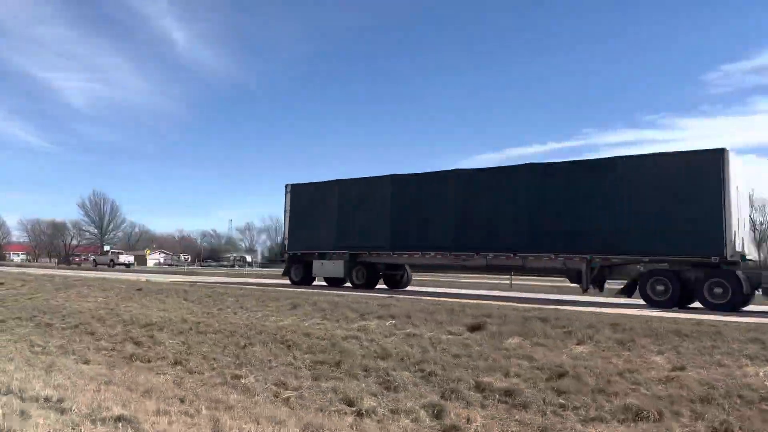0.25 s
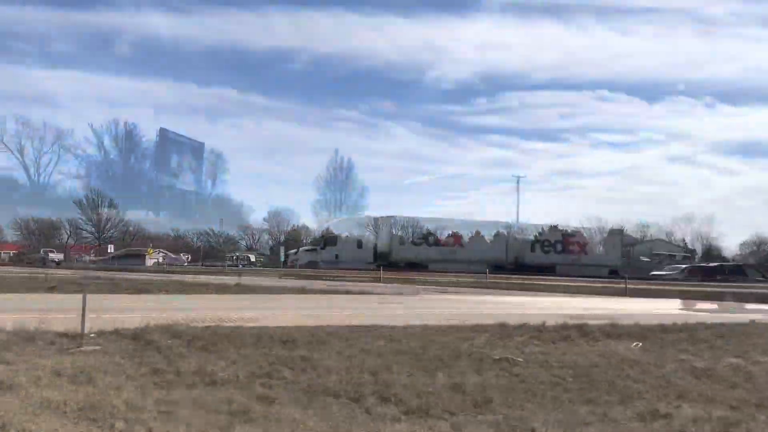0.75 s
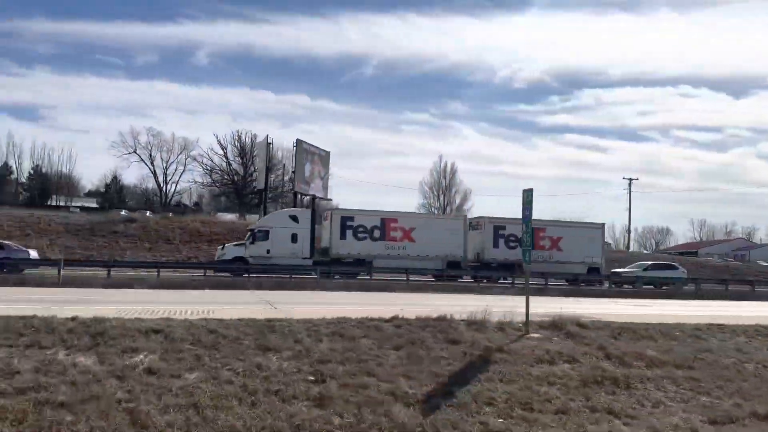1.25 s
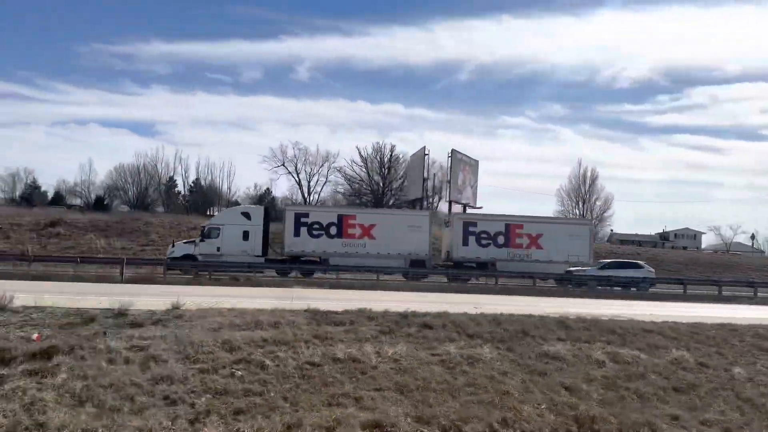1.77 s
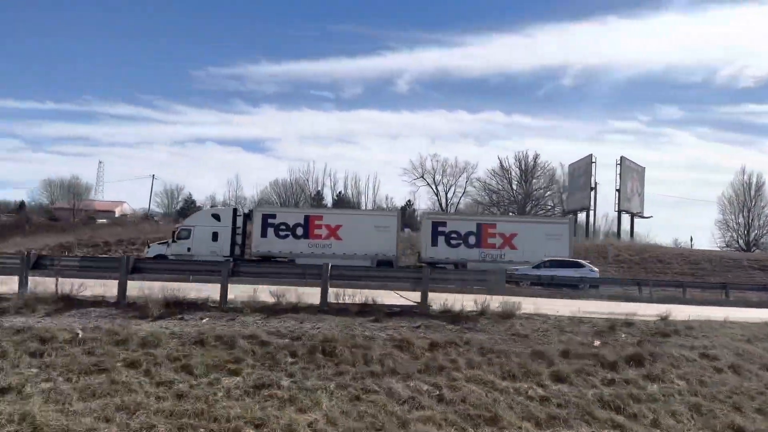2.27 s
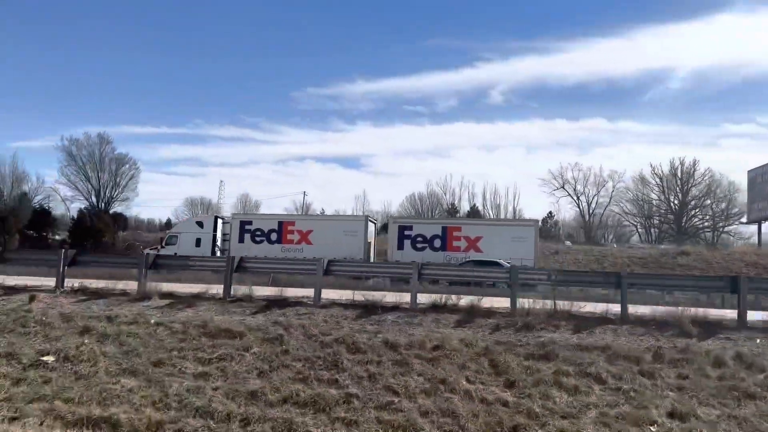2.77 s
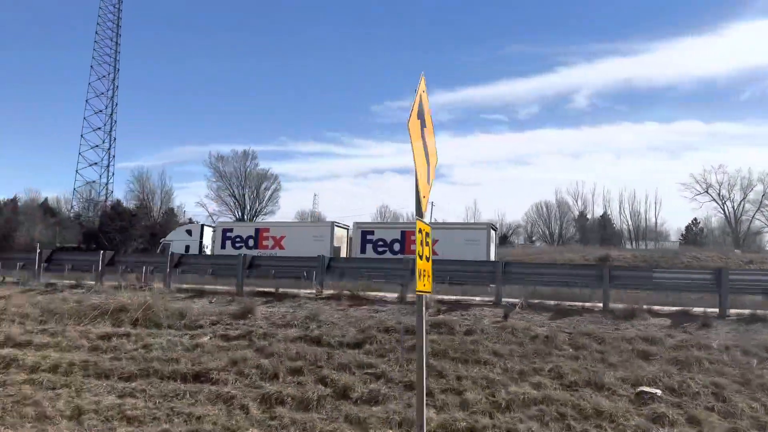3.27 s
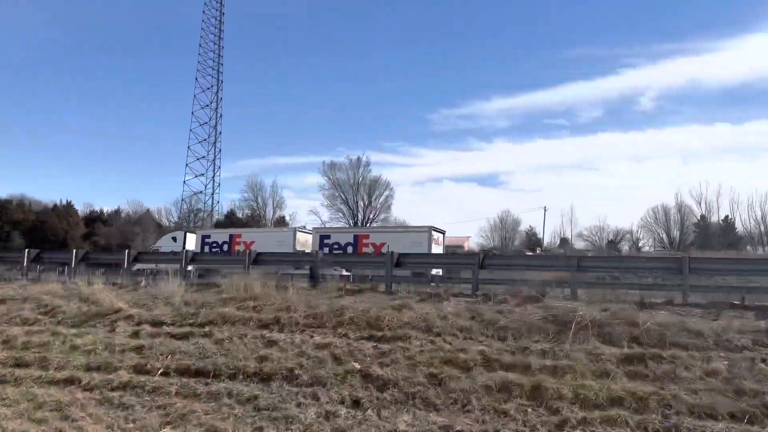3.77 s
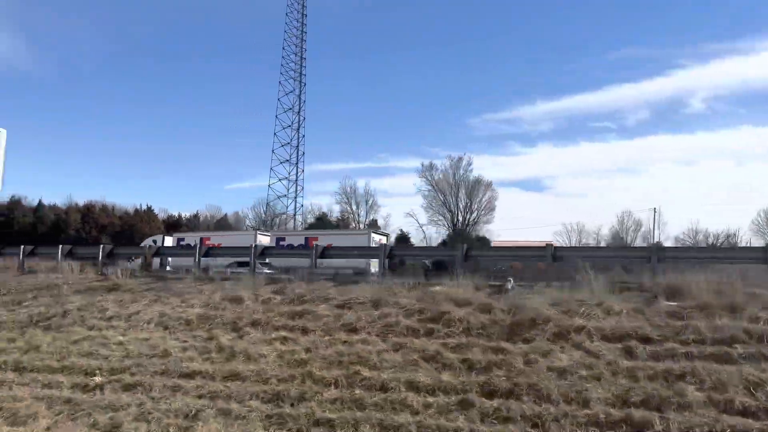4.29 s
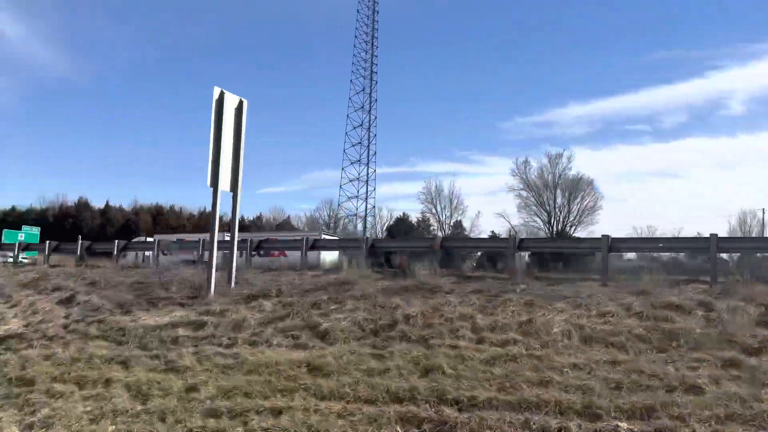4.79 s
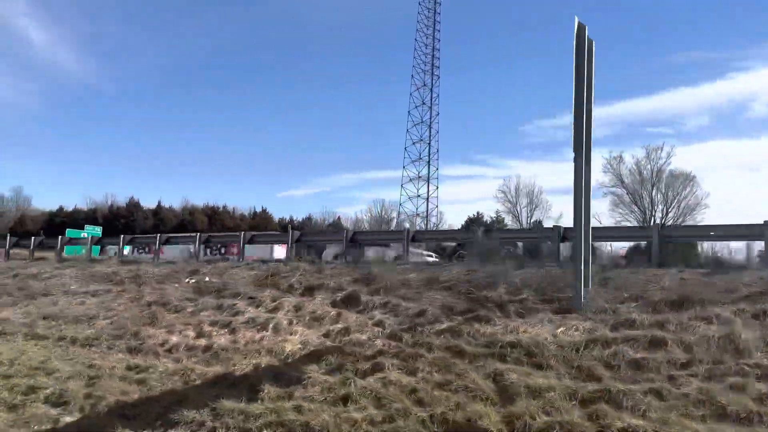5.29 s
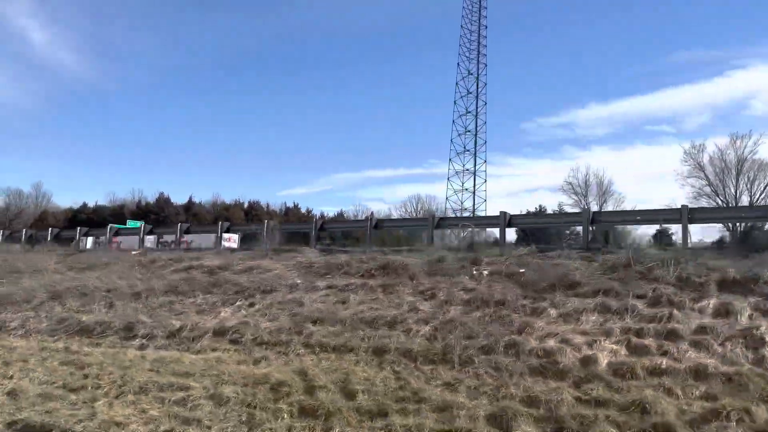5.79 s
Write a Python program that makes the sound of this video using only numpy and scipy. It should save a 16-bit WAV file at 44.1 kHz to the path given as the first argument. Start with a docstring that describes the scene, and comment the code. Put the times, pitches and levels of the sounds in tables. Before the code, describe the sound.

Close truck pass, tyre hiss and falling whistle cut off quickly, followed by thumping, rasping wind gusts and road roar beside a moving car's window.

```python
"""First a truck goes by close to a car's open side window: hissing tyres, a drone and a falling whistle.
Beyond it the highway roars on; at the window, air buffets the two ports of a hand-held phone,
rasping in short gusts and later spitting in the right port. All of it is coloured noise and fuzzy tones:
the truck follows its distance and Doppler shift, the wind follows drifting eddies and timed bursts."""
import sys
import numpy as np
from scipy import signal
from scipy.fft import rfft, irfft
from scipy.io import wavfile
from scipy.ndimage import uniform_filter1d, map_coordinates

SR = 44100
rng = np.random.default_rng(int(sys.argv[2]) if len(sys.argv) > 2 else 0)


def to_wav(s):
    """Save 16-bit WAV."""
    ch = np.atleast_2d(s).T  # columns
    pcm = np.round(np.clip(ch, -1, 1) * 32767)  # PCM
    wavfile.write(sys.argv[1], SR, pcm.astype(np.int16))


N = 266364
T = np.arange(N) / SR
HZ = np.fft.rfftfreq(N, 1 / SR)


def gain_of(db):
    """Decibels to amplitude."""
    return 10 ** (np.asarray(db) / 20)


def evened(x):
    """Scales to rms 1."""
    return x / np.sqrt(np.mean(x ** 2) + 1e-20)


def read(points):
    """A table over frequency, joined on a log axis."""
    hz, value = np.transpose(points)
    return np.interp(np.log(HZ + 1), np.log(hz), value)


def curves(rows):
    """Each column of a table over time, at every sample."""
    s, *columns = np.transpose(rows)
    return [np.interp(T, s, column) for column in columns]


def rise(start_s, full_s):
    """Goes from 0 to 1 between two times and holds."""
    return np.clip((T - start_s) / max(full_s - start_s, 1e-3), 0, 1)


def pan(balance_db):
    """Left and right gains of constant power; a positive balance leans left."""
    pair = gain_of(np.array([[.5], [-.5]]) * balance_db)
    return pair / np.sqrt(np.mean(pair ** 2, axis=0))


# How alike the two microphone ports hear a noise.
# Each row: frequency in Hz, likeness from 0 to 1, lead of the left port in radians.
PORT_LIKENESS = [(60, 0.55, 0), (282, 0.29, 1), (472, 0.75, -2.5), (569, 0.75, -3), (702, 0.98, -2.5),
                 (888, 0.5, -2.5), (1130, 0.17, -1.1), (1940, 0.45, -0.96), (2420, 0.16, -2.5),
                 (2530, 0, -3), (3350, 0.62, -4.5), (4430, 0.5, -6), (6400, 0.26, 1)]


def noise(colour, fall_db=15):
    """Noise of rms 1 as the two ports hear it; above its last point it falls by fall_db an octave."""
    left, other = rfft(rng.standard_normal((2, N)))
    hz, same, lead = np.transpose(PORT_LIKENESS)
    same = np.clip(read(np.c_[hz, same]), 0, 1)
    lead = read(np.c_[hz, lead])
    right = same * np.exp(-1j * lead) * left + np.sqrt(1 - same ** 2) * other
    colour_db = read(colour) - fall_db * np.log2(np.maximum(HZ / colour[-1][0], 1))
    return evened(irfft(np.array([left, right]) * gain_of(colour_db), N))


def wander(low_hz, high_hz):
    """A random drift of rms 1 between two rates."""
    band = 1 / np.sqrt((1 + (HZ / high_hz) ** 6) * (1 + (low_hz / (HZ + 1e-3)) ** 4))
    return evened(irfft(rfft(rng.standard_normal(N)) * band, N))


def flutter(drift, depth_db):
    """Turbulence comes in clumps: a gain of rms 1 that follows a drift in decibels."""
    return evened(gain_of(depth_db * np.minimum(drift, 2)))


def mottled(sound, patchy_db, size=5):
    """Moving air and shifting reflections brighten patches about 80 ms long and size bins of 43 Hz wide."""
    spectra = signal.stft(sound, nperseg=1024, noverlap=768)[2]
    patches = rng.standard_normal(spectra.shape[1:])
    patches = uniform_filter1d(patches, size=size, axis=0)
    patches = evened(uniform_filter1d(patches, size=14, axis=1))
    patchy = signal.istft(spectra * gain_of(patchy_db * patches), nperseg=1024, noverlap=768)[1]
    return evened(patchy[:, :N])


def fuzzy_tone(hz, width_hz):
    """A narrow band of noise around a steady or gliding pitch, drawn separately for each port."""
    turn = 2 * np.pi * np.cumsum(hz * np.ones(N)) / SR
    return np.array([wander(0.73, width_hz) * np.cos(turn) + wander(0.83, width_hz) * np.sin(turn)
                     for port in range(2)])


def add(mix, sound, s, length, level, steepness=2, tail_steepness=1.25):
    """Adds a burst centred on s, length wide at half height; steepness squares its front, the tail differs."""
    span = slice(max(round((s - 2 * length) * SR), 0), round((s + 3 * length) * SR))
    power = np.where(T[span] < s, steepness, tail_steepness)
    bell = 2 ** -abs(2 * (T[span] - s) / length) ** power
    mix[:, span] += level * evened(sound[:, span] * bell) * np.sqrt(np.mean(bell ** 2))


# Road noise of the car and of farther traffic.
# Each row: time in seconds, roar in dB before the roar offset, hiss in dB.
ROAD_LEVELS = [(0, -37, -38.5), (.6, -51, -35.5), (.9, -31.5, -43.5), (1.9, -49, -45.5), (2.5, -40.5, -49),
               (3.1, -38, -49), (4.2, -34, -51), (5.2, -35.5, -47), (6.04, -31, -45.5)]
# Colours of the roar and of the hiss. Each row: frequency in Hz, relative density in dB per Hz.
ROAR_COLOUR = [(170, 2), (340, -2), (600, 1.5), (860, 5), (1150, -11.5), (1800, -40), (2600, -41),
               (5000, -88.5)]
HISS_COLOUR = [(1500, 8), (2600, 2), (4000, -0.5), (5200, -9), (6200, -11.5), (7400, -11.5), (8800, -9.5),
               (10200, -17), (11900, -65), (13300, -20.5), (15700, -33.5)]


def road(roar_offset_db=3.5, hum_hz=565, hum_db=-41):
    """Roar and hiss of tyres as patchy noise; a faint narrow-band tyre hum joins late in the ride."""
    roar_db, hiss_db = curves(ROAD_LEVELS)
    roar = mottled(noise(ROAR_COLOUR), patchy_db=2.5) * gain_of(roar_db + roar_offset_db)
    hiss = mottled(noise(HISS_COLOUR), patchy_db=3.5) * gain_of(hiss_db)
    hum = fuzzy_tone(hum_hz, width_hz=15) * gain_of(hum_db) * rise(start_s=5.06, full_s=5.061)
    return roar + hiss + hum


# Colour of the tyre wash from the oncoming lanes.
# Each row: frequency in Hz, relative density in dB per Hz.
WASH_COLOUR = [(800, -21), (1300, 0), (1700, 18), (2100, -2), (2500, -17), (2900, -25)]


def oncoming(level_db=-46.5):
    """A brighter wash of tyres swells from the oncoming lanes late in the ride."""
    return noise(WASH_COLOUR) * gain_of(level_db) * rise(start_s=5.0, full_s=5.76)


# The close truck: when its tractor and its trailer wheels are nearest, and its distance over its speed (s)
TRACTOR_S, WHEELS_S, PASSING_S = 0.25, 0.47, 0.37
HIDDEN_S = 0.5  # it drops behind the window frame (s)
DOPPLER = 0.096  # share by which the pitch of engine and whistle swings


def distance(nearest_s):
    """How far a part of the truck is, as a multiple of its nearest distance."""
    return np.hypot(1, (T - nearest_s) / PASSING_S)


def passing(fade_db_per_s):
    """The truck's gain: it grows with nearness, then fades behind the window frame."""
    return gain_of(-fade_db_per_s * np.maximum(T - HIDDEN_S, 0)) / distance(WHEELS_S)


def doppler(nearest_s, swing):
    """Pitch factor of a part of the truck: high as it comes, low as it leaves."""
    return 1 - swing * (T - nearest_s) / PASSING_S / distance(nearest_s)


# Colour of the drumming trailer. Each row: frequency in Hz, relative density in dB per Hz.
TRAILER_COLOUR = [(60, -29), (110, -0.5), (160, 1), (240, -7.5), (300, -9), (390, -8), (520, -23),
                  (1000, -50)]


def diesel(hz=119, width_hz=9, level_db=-27.0):
    """The truck's low drone: two engine orders, sinking as it goes by, in the drumming of the trailer."""
    turn = 2 * np.pi * np.cumsum(hz * doppler(TRACTOR_S, DOPPLER)) / SR
    orders = np.zeros(N)
    for order in (1, 2):
        strength = 1 + .5 * wander(1.0, width_hz)
        orders += strength * np.cos(order * turn + rng.uniform(0, 2 * np.pi))
    drone = noise(TRAILER_COLOUR) + 0.42 * orders
    return drone * gain_of(level_db) * passing(fade_db_per_s=42.0)


def whistle(hz=9150, level_db=-47):
    """The truck's fuzzy high whistle on the right, perhaps its turbocharger, falling by Doppler shift."""
    tone = fuzzy_tone(hz * doppler(TRACTOR_S, DOPPLER), width_hz=360)
    return tone * gain_of(level_db) * passing(fade_db_per_s=94) * pan(balance_db=-17)


# The bright band of the truck's hiss, which sinks until about when the trailer wheels are nearest, then climbs.
# Each row: time in seconds, centre frequency in Hz, level in dB before the closing fade.
SHEEN_BAND = [(.05, 4250, -47), (.16, 4320, -41), (.28, 4000, -45), (.41, 3870, -40), (.48, 3420, -42),
              (.53, 3526, -37), (.57, 3630, -40), (.61, 3790, -49), (.68, 4050, -40), (.76, 4180, -65)]


def whine(hz=2060, level_db=-43, swing=0.044):
    """The tyres sing in a sinking band; above it a broken band of hiss dips and climbs as the trailer passes."""
    singing = fuzzy_tone(hz * doppler(WHEELS_S, swing), width_hz=71)
    singing = singing * gain_of(level_db) * passing(fade_db_per_s=96)
    sheen_hz, sheen_db = curves(SHEEN_BAND)
    sheen = fuzzy_tone(sheen_hz, width_hz=110) * flutter(wander(15, 70), depth_db=4)
    closing = 1 - rise(start_s=0.75, full_s=0.85)
    return singing + sheen * gain_of(sheen_db) * closing * pan(balance_db=8.0)


# Colour of the truck's tyre hiss. Each row: frequency in Hz, relative density in dB per Hz.
TYRE_COLOUR = [(300, -27), (560, 1), (800, 5), (1200, -1.5), (2000, -3.5), (2350, -13), (2900, -5.5),
               (4200, -7), (5200, -17), (7400, -24), (8800, -21), (10300, -29), (11900, -91), (13000, -22),
               (15500, -44)]


def truck(hiss_db=-34.5, echo=0.15, nearest_delay=0.00077, overhead_s=0.36, fade_db_per_s=56, swing=0.02):
    """Rough tyre hiss and its echo off the road: their comb sinks as the truck nears and rises as it leaves."""
    tyres = mottled(noise(TYRE_COLOUR), patchy_db=4.5, size=2) * flutter(wander(22, 160), depth_db=1.6)
    # reading the noise at an uneven pace bends its pitch
    heard = np.cumsum(doppler(WHEELS_S, swing))
    hiss = np.array([map_coordinates(side, [heard], order=5, mode="wrap") for side in tyres])
    delay = nearest_delay / distance(overhead_s)  # seconds
    hiss = hiss - echo * np.array([np.interp(T - delay, T, side) for side in hiss])
    # hiss_db sets the level of the band from 3 to 7 kHz, before the pass shapes it
    treble_band = signal.butter(4, [3000, 7000], "band", fs=SR, output="sos")
    treble = signal.sosfilt(treble_band, hiss)
    return hiss / treble.std() * gain_of(hiss_db) * passing(fade_db_per_s) * pan(balance_db=1.0)


# Colour of the open window's deep boom. Each row: frequency in Hz, relative density in dB per Hz.
WINDOW_BOOM_COLOUR = [(12, -17), (25, -8), (40, 9), (52, 6), (75, -12), (150, -53)]


def boom(early_db=-41, late_db=-30):
    """The deep boom of the open window, low noise that sets in fully midway through the ride."""
    level_db = early_db + (late_db - early_db) * rise(start_s=3.66, full_s=3.661)
    return noise(WINDOW_BOOM_COLOUR) * gain_of(level_db)


# Colour of the air's low rumble. Each row: frequency in Hz, relative density in dB per Hz.
RUMBLE_COLOUR = [(30, -40), (48, -5), (64, 5), (100, -2.5), (150, -10), (260, -16.5), (600, -83)]


def rumbling():
    """The low rumble of air on the ports, held level so that the airflow alone sets its swell."""
    low = noise(RUMBLE_COLOUR)
    return low / np.sqrt(uniform_filter1d(np.mean(low ** 2, axis=0), size=5000))


# Small fast eddies that tear across the microphone. Each row: time in seconds, length in seconds,
# rasp in dB before its offset, crackle in dB above that rasp column, thud in dB.
SMALL_EDDIES = [(0.031, 0.004, -26, -8, -24), (0.183, 0.0045, -29, 0, -19), (0.434, 0.0071, -29, -20, -26),
                (0.519, 0.0071, -24, -12, -28), (0.798, 0.0058, -20, -33, -16),
                (0.856, 0.01, -21, -24, -16), (0.915, .016, -29, -21, -23.5), (0.955, 0.009, -29, -30, -18),
                (0.984, 0.009, -31, -25, -21), (1.021, 0.0034, -26, -24, -26),
                (1.056, 0.0037, -30, -24, -17.5), (1.084, 0.005, -25, -12, -17),
                (1.103, 0.011, -24, -19, -18), (1.141, 0.0089, -30.5, -22, -20),
                (1.159, .014, -26, -11, -21), (1.178, .003, -26, -26, -29),
                (1.214, 0.0056, -22.5, -16, -17), (1.246, 0.0033, -38, -24, -17),
                (1.289, 0.014, -26.5, -13, -19), (1.334, 0.0038, -35, -13, -17),
                (1.366, 0.009, -25, -18, -20), (1.378, .0065, -14, -11.5, -14.5),
                (1.408, .0064, -28, -24, -22), (1.432, .0086, -23.5, -12, -12),
                (1.468, 0.0029, -19, -24, -14.5), (1.516, 0.0041, -18.5, -39, -15.5),
                (1.579, 0.0032, -25.5, -9, -13.5), (1.607, 0.015, -28.5, -27, -16),
                (1.663, 0.0052, -9.5, -9.5, -9), (1.698, 0.0033, -18, -31, -17),
                (1.728, 0.01, -16, -12.5, -16.5), (1.751, 0.0046, -25.5, -24, -17),
                (1.837, 0.0073, -18.5, -13, -19.5), (1.944, 0.0072, -11.5, -15, -15),
                (1.957, 0.0056, -19.5, -9, -15), (1.99, 0.012, -22, -32, -19),
                (2.016, 0.0042, -20.5, -30, -14), (2.099, 0.0074, -20.5, -13.5, -15),
                (2.124, 0.0044, -22, -25, -19), (2.188, .0096, -24.5, -7, -19),
                (2.241, 0.0034, -13.5, -2.5, -10.5), (2.27, 0.0085, -17, -16.5, -12),
                (2.31, .0033, -18.5, -27, -24), (2.338, 0.0023, -15.5, -16, -17),
                (2.362, .004, -12.5, -32, -13), (2.424, .004, -12, -34, -8.5),
                (2.445, 0.0044, -18.5, -25, -16), (2.478, 0.0048, -16.5, -6, -20),
                (2.54, .015, -26, -21, -26), (2.592, 0.011, -25.5, -14, -23), (2.641, 0.027, -23, -27, -15),
                (2.747, 0.0067, -24.5, -30, -14.5), (2.757, 0.004, -24.5, -24, -23),
                (2.821, 0.0094, -25.5, -30, -13.5), (2.842, 0.012, -23.5, -36, -20),
                (2.941, 0.014, -16.5, -8, -14.5), (2.955, .0074, -22, -12, -19),
                (3.122, 0.013, -28.5, -28, -24.5), (3.16, 0.0053, -27.5, -34, -22),
                (3.19, 0.012, -27.5, -30, -16), (3.235, 0.008, -17, -18, -19),
                (3.276, .015, -20.5, -12.5, -23.5), (3.303, 0.0074, -30, -22, -26),
                (3.565, 0.0067, -26, -20, -16.5), (3.598, 0.017, -21, -6, -26.5),
                (3.609, .005, -26.5, -5, -19.5), (3.72, .016, -27.5, -39, -25.5),
                (3.78, 0.0084, -32, -35, -21), (3.932, 0.021, -26.5, -23, -26),
                (3.953, 0.013, -25, -12, -32), (3.996, 0.023, -27.5, -20, -40),
                (4.165, 0.012, -24.5, -18, -22), (4.451, .008, -21.5, -13, -17.5),
                (4.579, .005, -29, -21, -22.5), (4.678, 0.0048, -28.5, -25, -27.5),
                (4.727, 0.0077, -19.5, -14, -15), (4.743, .01, -32.5, -10, -29),
                (4.807, 0.0046, -27, -13, -27), (4.816, 0.0054, -23, -7, -22.5),
                (4.825, 0.011, -34.5, -11, -25), (4.869, 0.0086, -25.5, -13.5, -37)]


def lulls(depth_db=-4, lull_s=0.0083):
    """The flow slackens for an instant before each sharp eddy: a gain that dips there."""
    slack = np.zeros(N)
    for s, length, *_ in SMALL_EDDIES:
        front = s - length / 2
        slack[max(round((front - lull_s) * SR), 0):round(front * SR)] = 1
    return gain_of(depth_db * uniform_filter1d(slack, size=130))


# The airstream at the window. Each row: time in seconds, rumble in dB and buffeting in dB before their offsets,
# rasp in dB above that buffeting column, roughness from 0 to 1.
WIND_LEVELS = [(0, -29, -28, -27, 0.3), (.62, -33.5, -29, -4, 0.2), (.85, -22.5, -25.5, -5.5, 0.5),
               (1.2, -21, -23.5, -6.5, 0.55), (1.45, -21, -24, -7.5, 1), (1.8, -20, -28, -14.5, 0.9),
               (2.06, -18.5, -26.5, -12, .7), (2.2, -21, -22.5, -6.5, 0.8), (2.43, -14, -21, -6, 0.6),
               (2.7, -20, -26, -8, 0.26), (3.03, -23, -31.5, -4.5, 0.1), (3.18, -25.5, -23.5, -10, 0.6),
               (3.42, -23, -34, -8, 0.9), (3.8, -23.5, -34.5, -5.5, 0.9), (4.2, -26, -25.5, -12, 0.3),
               (4.7, -32, -26.5, -11, 0.84), (5.0, -27.5, -33.5, -8.5, 0.75), (5.5, -26, -28, -7, 0.5),
               (6.04, -31, -26, -22, 0.2)]
# How the air meets the two ports. Each row: time in seconds, left over right in dB before each sound's leaning,
# share of the bass that both ports have in common from 0 to 1.
PORT_BALANCE = [(0, 4.5, 0.2), (.7, 6, 0), (1.1, 6.5, 0), (1.8, 3, 0.2), (2.6, 0.5, 0), (3.82, 0.5, 0),
                (4.0, 0.5, 0.98), (4.9, 0.5, 1), (6.04, -3, 1)]
# Colours of the buffeting and of the rasp above it. Each row: frequency in Hz, relative density in dB per Hz.
BUFFET_COLOUR = [(50, -4), (90, -1.5), (130, -0.5), (220, -4), (370, -8), (560, -10.5), (1000, -15),
                 (2000, -53), (4000, -85)]
RASP_COLOUR = [(200, -26), (450, 7.5), (800, -0.5), (1350, -2), (2000, -9.5), (2800, -19.5), (4200, -29.5),
               (6000, -37), (10000, -87.5)]


def airstream(rumble_offset_db=-2.26, buffet_offset_db=-0.7):
    """Rumble and buffeting; the same small eddies shake the higher rasp more deeply."""
    rumble_db, buffet_db, rasp_db, roughness = curves(WIND_LEVELS)
    balance_db, _ = curves(PORT_BALANCE)
    eddies = wander(1.8, 57) * roughness
    low = rumbling() * gain_of(rumble_db + rumble_offset_db) * flutter(wander(4.9, 6.5), depth_db=3.0)
    body = noise(BUFFET_COLOUR) * gain_of(buffet_db + buffet_offset_db) * flutter(eddies, depth_db=5.0)
    rasp = noise(RASP_COLOUR) * gain_of(buffet_db + rasp_db) * flutter(eddies, depth_db=5.5)
    rasp = rasp * flutter(wander(60, 250) * roughness, depth_db=5.0)
    return low * pan(0.5 * balance_db) + (body + rasp) * lulls() * pan(balance_db)


# The sharpest spits of the jet in the right port. Each row: time in seconds, level in dB before the spit offset.
JET_SPITS = [(2.66, -39.5), (2.769, -35), (2.846, -37), (2.951, -35.5), (3.134, -42), (3.234, -41),
             (3.273, -43), (3.313, -41), (3.356, -44), (3.492, -51), (3.585, -38.5), (3.683, -46),
             (3.827, -40), (3.924, -45), (3.955, -42), (4.009, -42.5), (4.1, -36.5), (4.171, -44),
             (4.209, -48), (4.256, -51), (4.356, -46), (4.37, -42), (4.39, -36), (4.42, -42), (4.449, -40),
             (4.496, -33), (4.55, -40), (4.58, -33.5), (4.623, -37), (4.696, -41), (4.724, -41),
             (4.764, -38), (4.817, -40), (4.929, -36), (4.982, -47), (5.004, -45), (5.025, -36),
             (5.054, -38), (5.079, -44), (5.096, -32), (5.143, -46), (5.175, -38), (5.198, -34),
             (5.217, -38), (5.261, -37.5), (5.373, -36.5), (5.419, -43), (5.567, -48), (5.668, -46),
             (5.733, -34), (5.791, -34.5), (5.817, -40)]
# Colours of the jet and of the air fluttering at the window edge.
# Each row: frequency in Hz, relative density in dB per Hz.
JET_COLOUR = [(2000, 6.5), (5000, -12), (7800, -19), (8100, 7), (8800, 5), (9600, 0), (10400, -9),
              (11500, -33), (14000, -34), (16000, -52)]
EDGE_COLOUR = [(300, -8), (600, 20.5), (1000, 8), (2000, 1.5), (2700, -12), (4000, -10.5), (7000, -17.5),
               (10000, -43), (15500, -33)]
JET_S, JET_FULL_S = 1.5, 4.4  # air starts to fizz in the right port; its level stops climbing (s)


def fizz(first_db=-58, full_db=-51.0, spit_offset_db=1, spit_s=0.0053, ease_db=-3, flap_db=-33.5):
    """A thin jet flutters and spits in the right port; late on it eases and the window-edge air flutters too."""
    jet, eddies = noise(JET_COLOUR), wander(23.0, 120)
    level_db = first_db + (full_db - first_db) * rise(JET_S, JET_FULL_S)
    level_db = level_db + ease_db * rise(start_s=5.2, full_s=5.5)
    out = jet * gain_of(level_db) * flutter(eddies, depth_db=7.0) * rise(JET_S, JET_S + 0.9)
    for s, spit_db in JET_SPITS:
        add(out, jet, s, spit_s, gain_of(spit_db + spit_offset_db))
    flap = noise(EDGE_COLOUR) * gain_of(flap_db) * flutter(eddies, depth_db=9.0)
    flap = flap * rise(start_s=4.83, full_s=5.53)
    return out * pan(balance_db=-28.0) + flap * pan(balance_db=-3.5)


# Large slow eddies that thump the microphone.
# Each row: time in seconds, length in seconds, level in dB before the offsets of thump and surge.
LARGE_EDDIES = [(0.02, 0.026, -20), (0.185, 0.013, -16), (0.34, 0.043, -22.5), (0.413, 0.019, -17),
                (0.454, 0.027, -16), (0.819, 0.032, -15.5), (0.856, 0.013, -37), (0.953, 0.013, -18),
                (1.023, 0.015, -22), (1.081, 0.026, -14), (1.171, 0.011, -17), (1.24, 0.0094, -24),
                (1.395, 0.029, -15), (1.433, 0.03, -17.5), (1.46, 0.031, -12.5), (1.593, 0.027, -16.5),
                (1.672, 0.027, -7.5), (1.699, 0.015, -17), (1.842, 0.011, -9.5), (1.95, 0.013, -14),
                (2.009, 0.015, -7.5), (2.124, 0.021, -16.5), (2.17, 0.025, -9), (2.206, 0.012, -11.5),
                (2.248, 0.024, -10), (2.294, 0.023, -11), (2.35, 0.015, -13), (2.381, 0.017, -9.5),
                (2.417, 0.014, -8), (2.487, 0.017, -11.5), (2.547, 0.021, -14), (2.606, 0.019, -17.5),
                (2.656, 0.038, -15.5), (2.753, 0.021, -9), (2.842, 0.035, -12), (2.941, 0.044, -15.5),
                (3.154, 0.011, -14.5), (3.238, 0.018, -21), (3.286, 0.01, -19.5), (3.408, 0.022, -18),
                (3.496, 0.0087, -15), (3.56, 0.0078, -31), (3.622, 0.017, -17.5), (3.718, 0.01, -19),
                (3.832, 0.01, -19.5), (3.967, 0.017, -22), (4.177, 0.021, -22), (4.454, 0.01, -20.5),
                (4.678, 0.02, -17), (4.727, 0.01, -20), (4.815, 0.016, -23)]
# Colour of the thump. Each row: frequency in Hz, relative density in dB per Hz.
THUMP_COLOUR = [(50, -30), (90, 4.5), (140, 3), (250, -3), (390, -8.5), (600, -17), (1000, -16.5),
                (2500, -41.5)]


def thumps(thump_offset_db=-3.0, surge_offset_db=-6, surge_lag_s=0.006, surge_s=0.026):
    """Each large eddy pushes on the ports with a dull thump, and a surge of rumble follows."""
    thump, surge, out = noise(THUMP_COLOUR), rumbling(), np.zeros((2, N))
    balance_db, _ = curves(PORT_BALANCE)
    for s, length, level_db in LARGE_EDDIES:
        balance = np.interp(s, T, balance_db)
        add(out, thump, s, length, gain_of(level_db + thump_offset_db) * pan(balance), steepness=2.7)
        add(out, surge, s + surge_lag_s, surge_s, gain_of(level_db + surge_offset_db))
    return out


# Colours of a small eddy's tearing rasp, its crackle and the hollow thud under it.
# Each row: frequency in Hz, relative density in dB per Hz.
TEAR_COLOUR = [(250, -15.5), (700, -4.5), (1000, 2), (1400, 3), (2100, -8.5), (2800, -20.5), (4200, -32),
               (6000, -40.5), (10000, -86)]
CRACKLE_COLOUR = [(1400, -10), (2200, 11), (2800, 14), (3400, 9.5), (4300, 3.5), (5600, -9), (7500, -14),
                  (9500, -19), (11500, -44), (14000, -31), (15800, -36)]
THUD_COLOUR = [(130, -14), (250, 4), (380, 2.5), (520, 0.5), (680, -4), (1100, -23)]


def gusts(rasp_offset_db=1.0, least_thud_s=0.0073, wake_offset_db=-12, wake_s=0.016, wake_lag_s=0.014, lean=2.15):
    """Each small eddy tears across the ports with rasp, crackle and thud; smaller ones trail it raggedly."""
    tearing = wander(78, 570)
    rasp = mottled(noise(TEAR_COLOUR), patchy_db=3.0, size=9) * flutter(tearing, depth_db=3.5)
    crackle = mottled(noise(CRACKLE_COLOUR), patchy_db=2.0, size=12) * flutter(tearing, depth_db=6.5)
    thud = noise(THUD_COLOUR)
    wake = noise(RASP_COLOUR) * flutter(wander(40, 270), depth_db=11.5)
    out = np.zeros((2, N))
    balance_db, _ = curves(PORT_BALANCE)
    for s, length, rasp_db, crackle_db, thud_db in SMALL_EDDIES:
        balance = lean * np.interp(s, T, balance_db)  # eddies favour the windward port
        add(out, rasp, s, length, gain_of(rasp_db + rasp_offset_db) * pan(balance))
        add(out, thud, s, max(length, least_thud_s), gain_of(thud_db) * pan(0.65 * balance))
        add(out, wake, s + wake_lag_s, wake_s, gain_of(rasp_db + wake_offset_db) * pan(balance))
        add(out, crackle, s, 0.77 * length, gain_of(rasp_db + crackle_db) * pan(4.2 * balance))
    return out


def scene():
    """Traffic and the passing truck, and the wind of the ride on top of them."""
    traffic = road() + oncoming()
    close_truck = diesel() + whistle() + whine() + truck()
    wind = boom() + airstream() + fizz() + thumps() + gusts()
    return traffic + close_truck + wind


def record(dry, early_mono_hz=420, late_mono_hz=690, low_cut_hz=24, edge_hz=15700):
    """Cuts the deepest bass, narrows the shared bass to mono, rounds the peaks and limits the band."""
    _, common = curves(PORT_BALANCE)
    dry = signal.sosfilt(signal.butter(2, low_cut_hz, "high", fs=SR, output="sos"), dry)
    side = rfft(dry[0] - dry[1]) / 2
    early, late = (irfft(side / (1 + (HZ / hz) ** 6), N) for hz in (early_mono_hz, late_mono_hz))
    # late in the ride the narrowing reaches higher
    side_bass = early + (late - early) * rise(start_s=4.24, full_s=5.07)
    narrowed = dry - np.array([[1], [-1]]) * np.clip(common, 0, 1) * side_bass
    rounded = narrowed / (1 + narrowed ** 6) ** (1 / 6)
    band_limit = signal.firwin(511, edge_hz, window=("kaiser", 9), fs=SR)
    return signal.oaconvolve(rounded, band_limit[None], "same")


dry = scene()
out = record(dry)
to_wav(out)
```